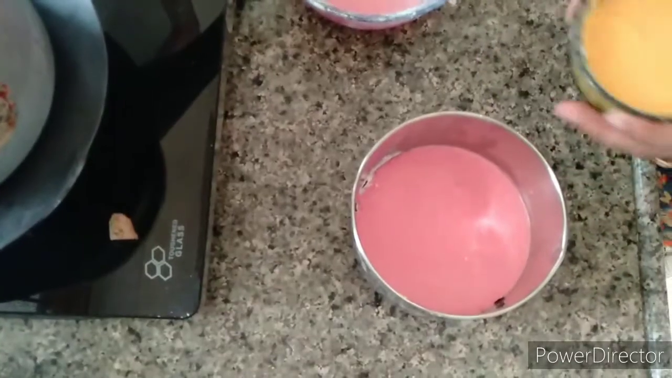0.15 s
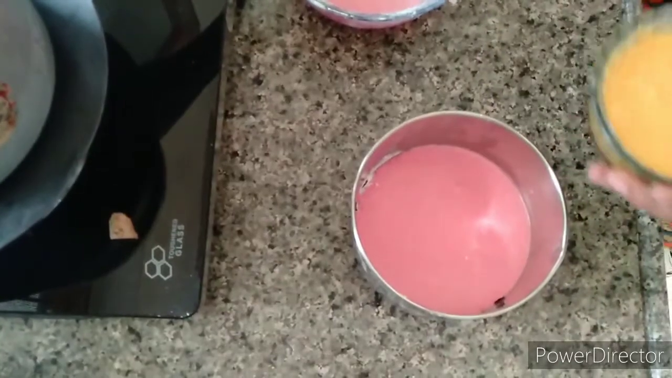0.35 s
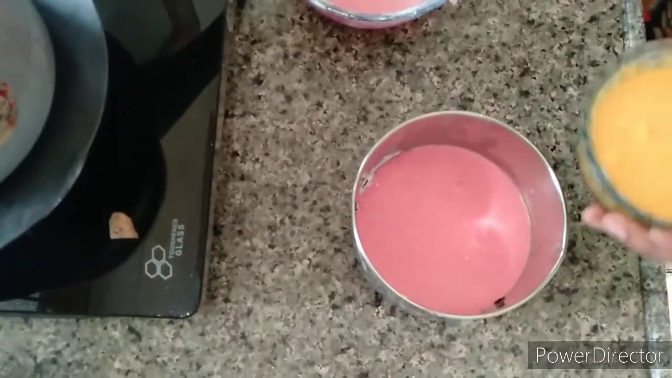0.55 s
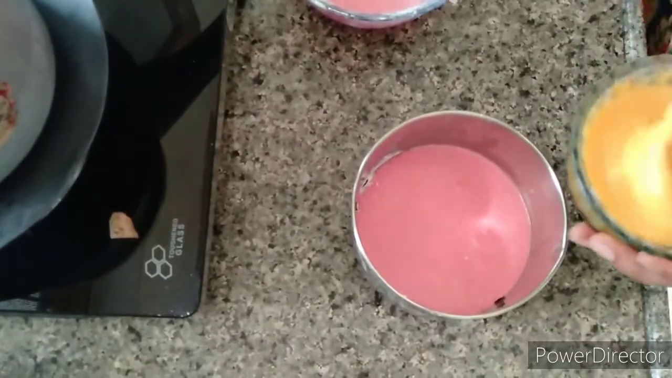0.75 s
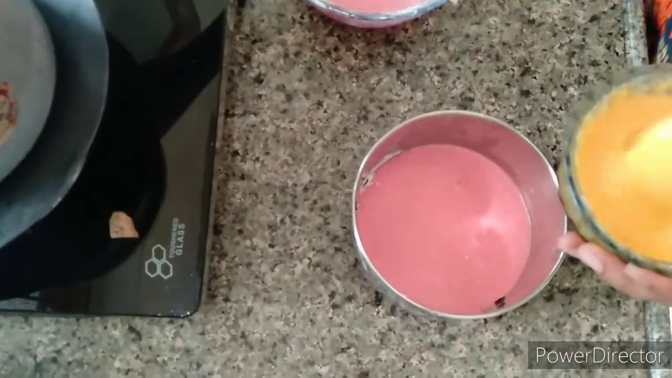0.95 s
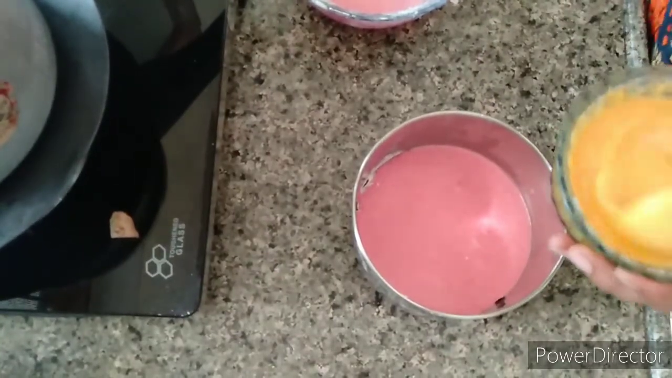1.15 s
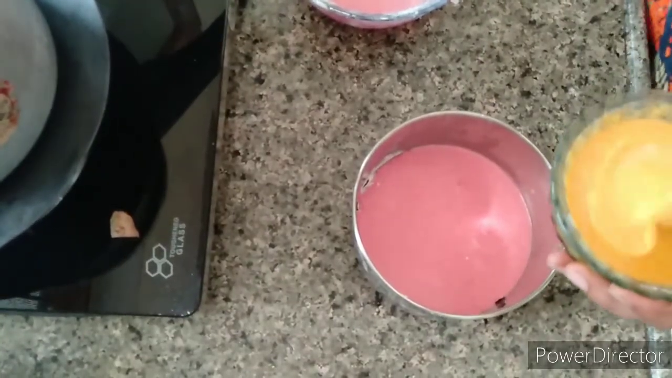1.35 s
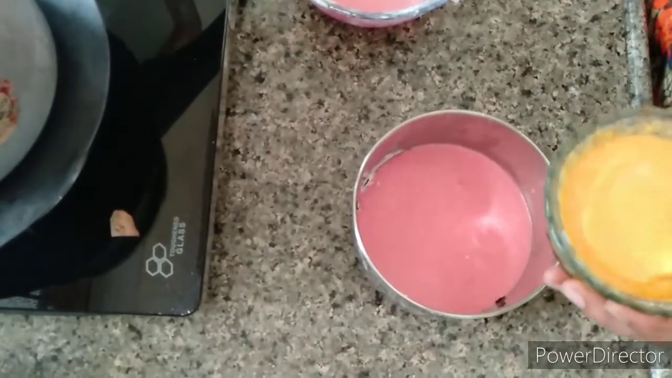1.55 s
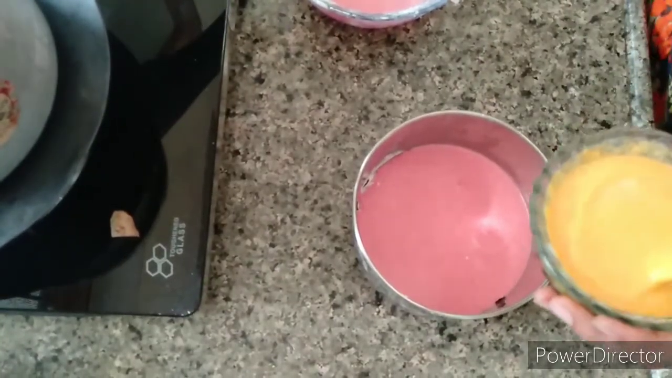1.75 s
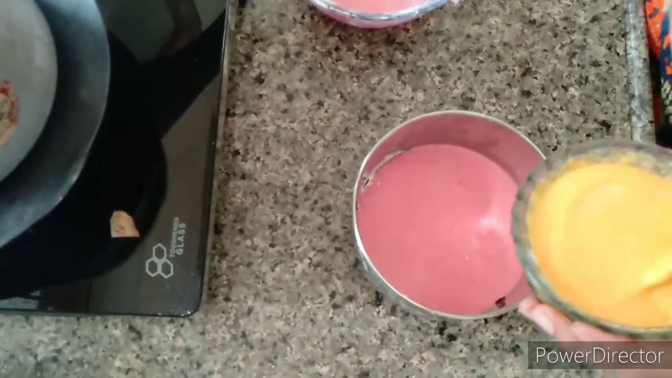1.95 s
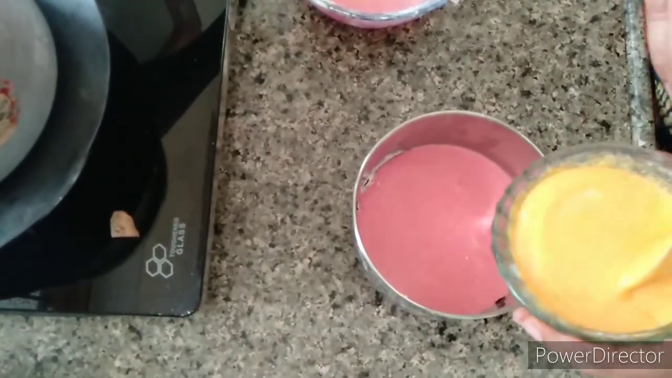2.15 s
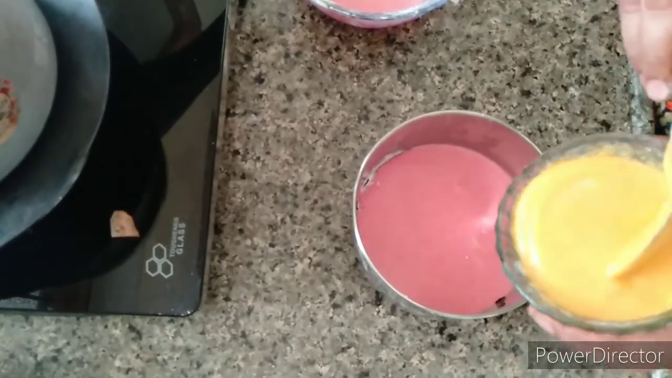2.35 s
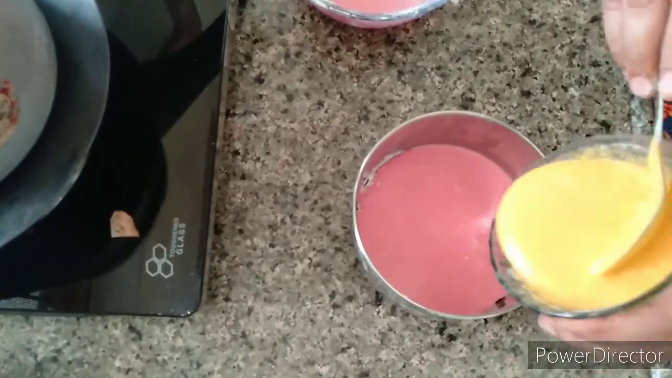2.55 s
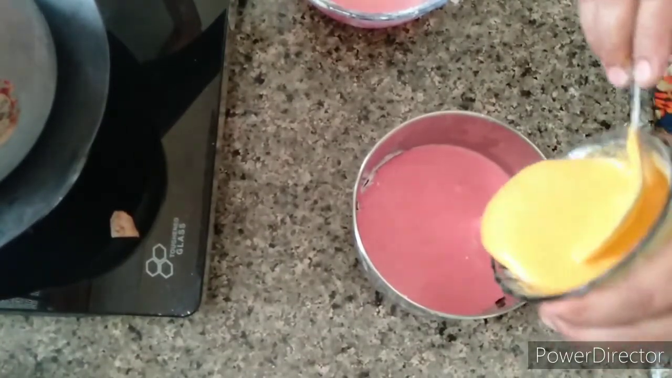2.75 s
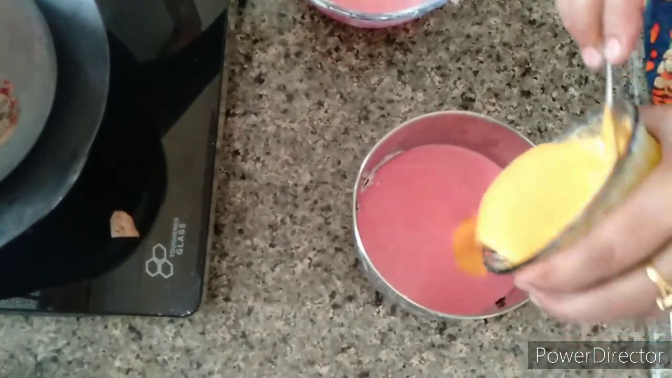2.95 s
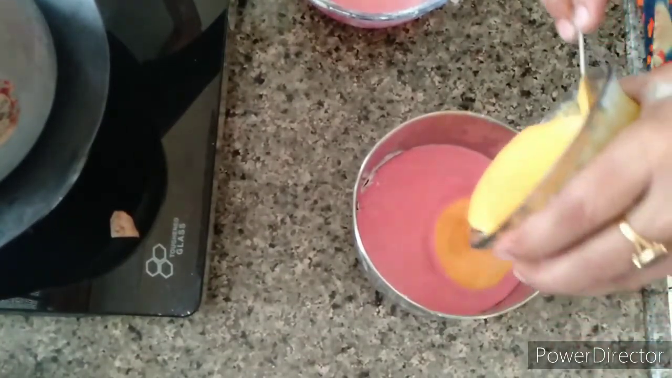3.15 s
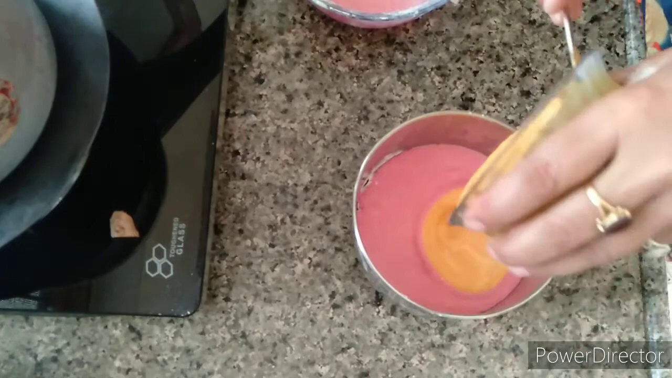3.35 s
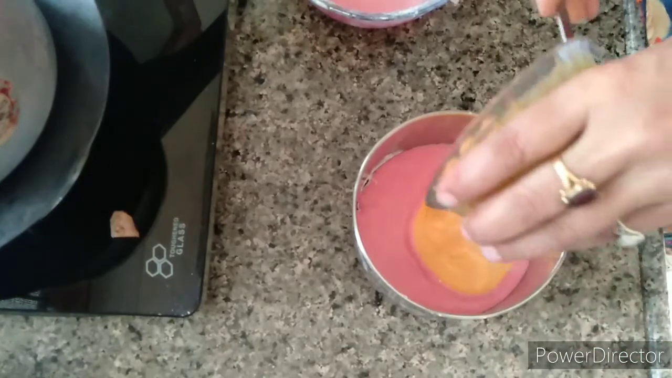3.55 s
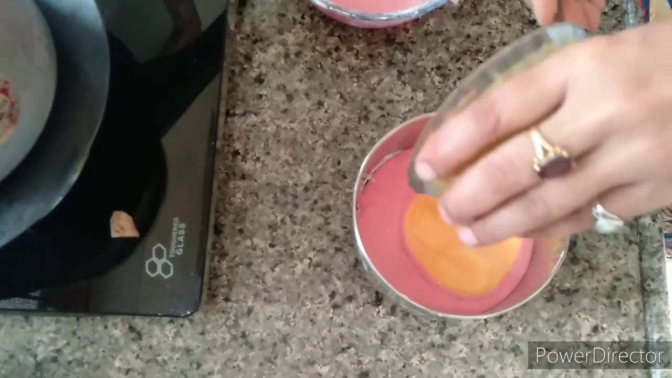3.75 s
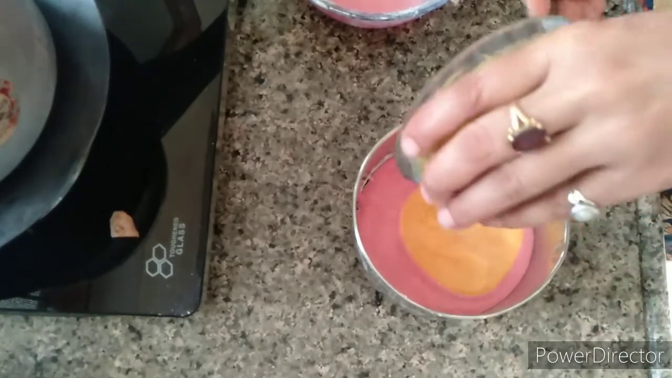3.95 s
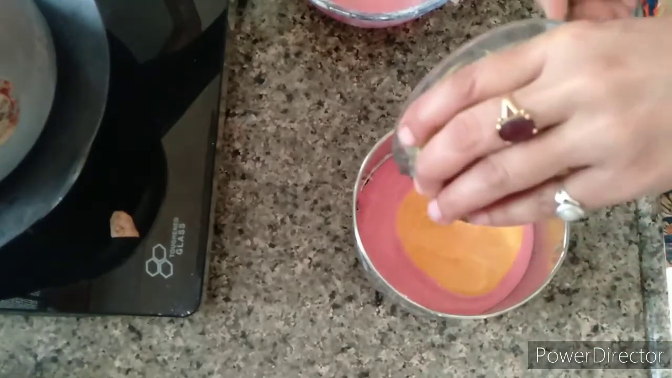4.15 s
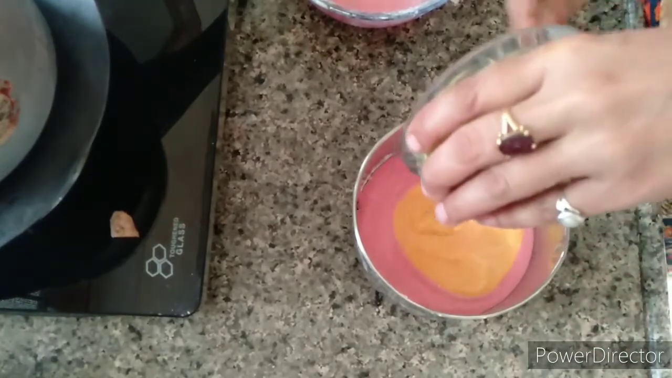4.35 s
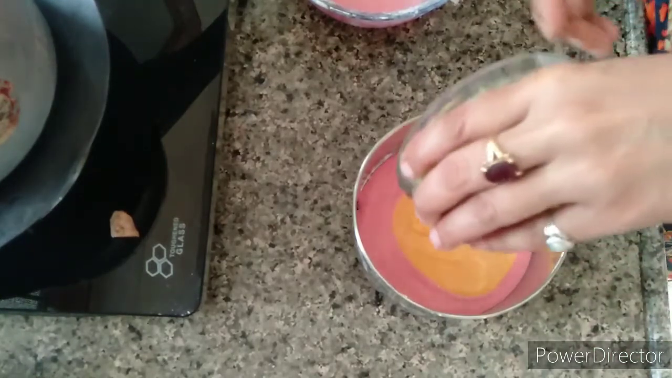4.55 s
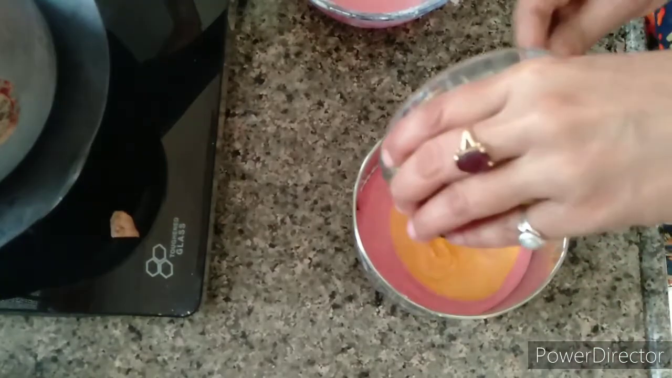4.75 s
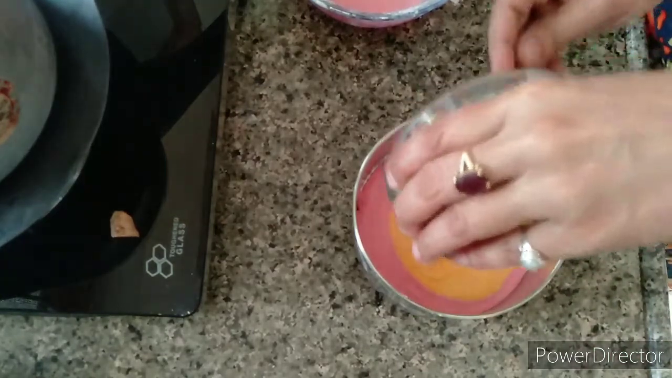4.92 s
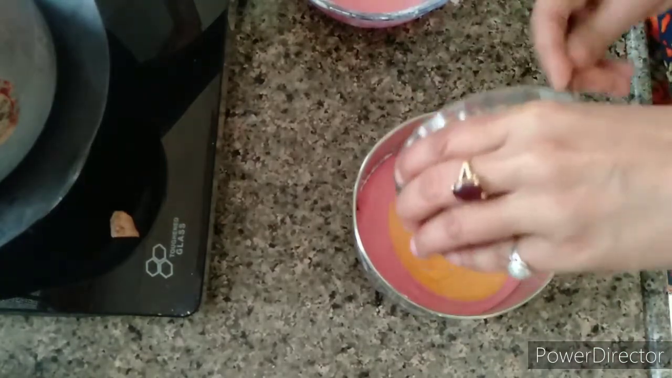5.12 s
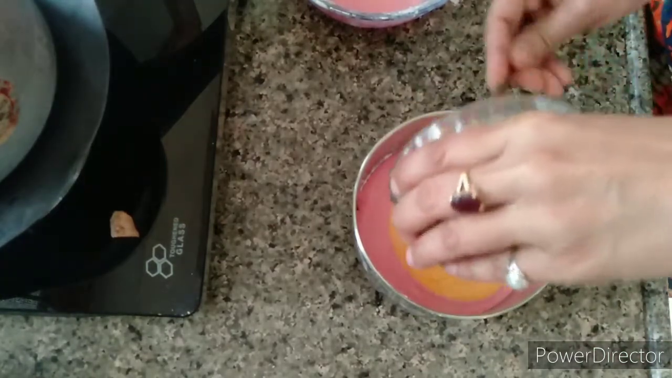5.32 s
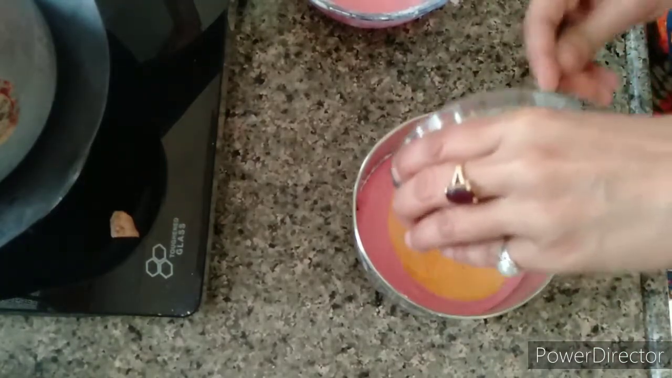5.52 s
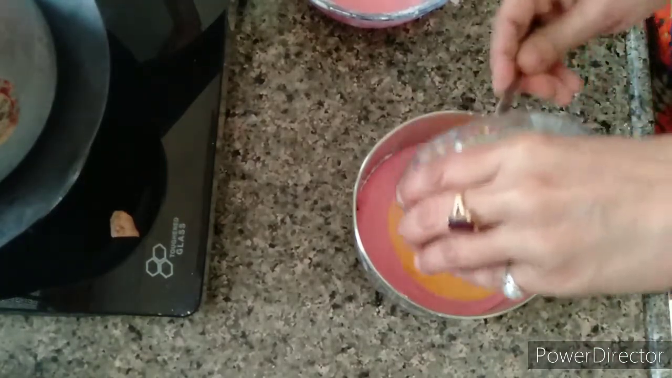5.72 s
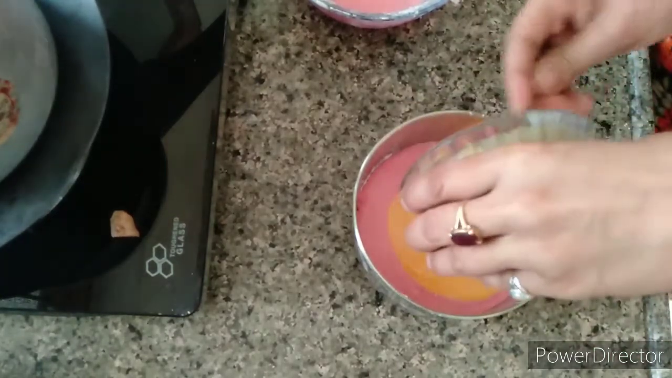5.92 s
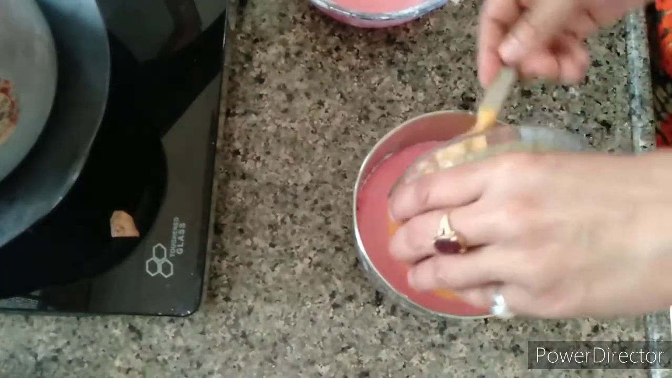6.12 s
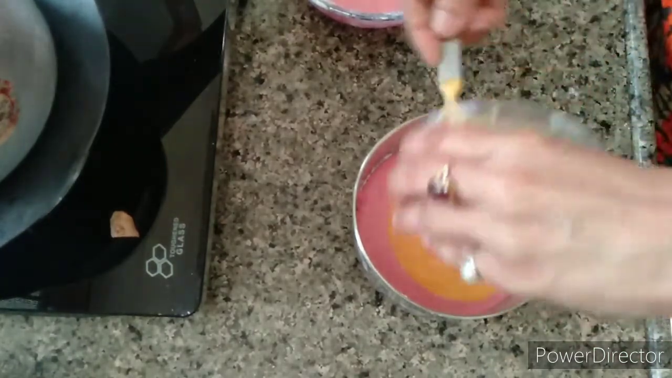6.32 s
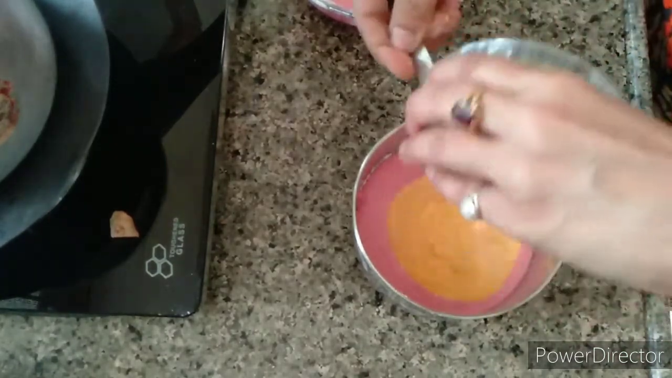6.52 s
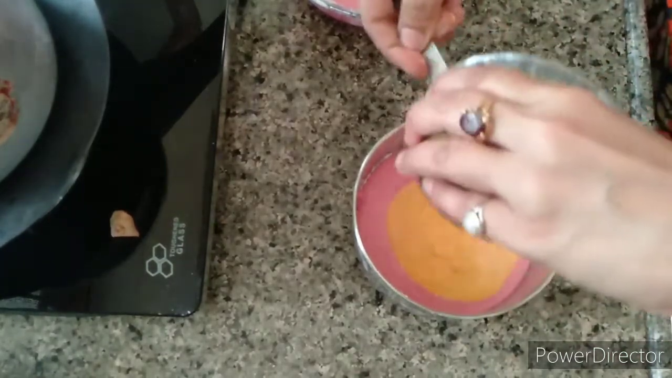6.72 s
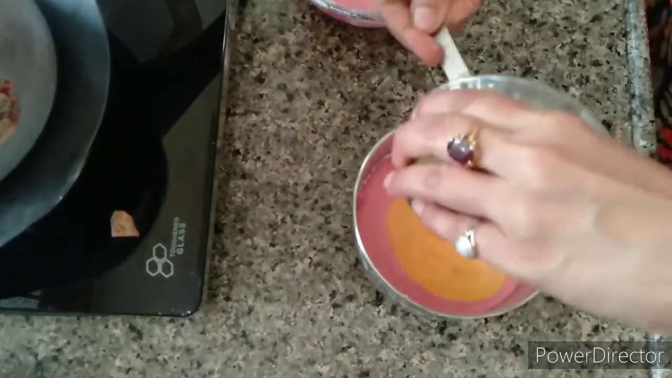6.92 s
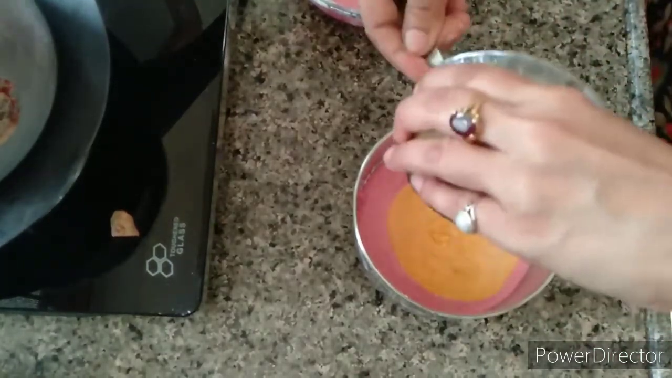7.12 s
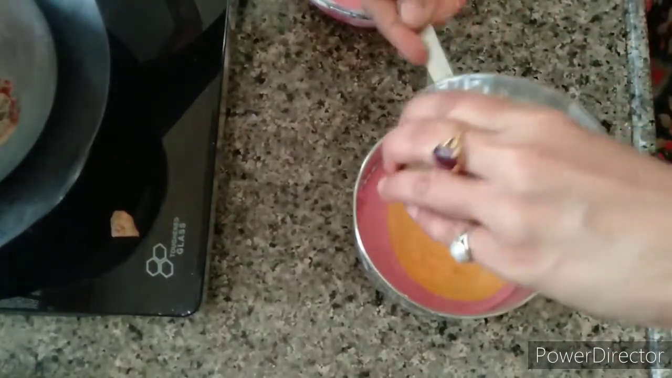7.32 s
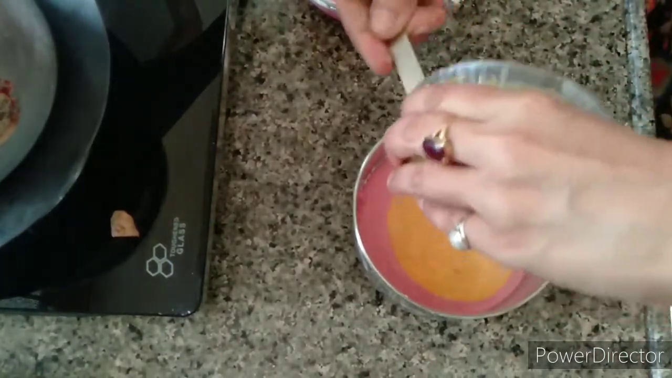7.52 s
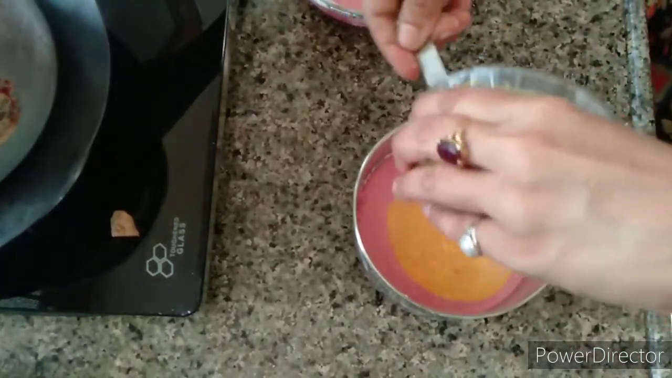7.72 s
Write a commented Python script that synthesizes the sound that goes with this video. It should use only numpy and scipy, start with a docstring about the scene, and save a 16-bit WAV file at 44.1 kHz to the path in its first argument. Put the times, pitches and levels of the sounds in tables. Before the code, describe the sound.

After soft rustling, a dull crockery knock and thin bird chirps, a metal spoon taps a glass bowl with increasingly loud, short, bright clinks.

```python
"""Spoon against a glass bowl

A steel spoon clinks on a hand-held glass bowl of batter in a small hard kitchen: each blow is a noisy clack,
a spoon ring, decaying paired bowl modes and a hollow pock. Grains of noise rub, short gliding tones squeak,
and banded noise drags, swishes and rustles. A crockery knock sounds early on; a bird calls in gliding tones,
a far motor drones in shaft harmonics, and hum, whines and hiss fill the room."""
import sys
import numpy as np
from scipy import signal
from scipy.fft import rfft, irfft
from scipy.io import wavfile
from scipy.ndimage import uniform_filter1d

SR = 44100
rng = np.random.default_rng(int(sys.argv[2]) if len(sys.argv) > 2 else 0)


def inscribe(sig):
    """Save sig as 16-bit PCM at rate SR to the path in sys.argv[1].

    A 1-D sig is mono; a 2-D sig holds one channel per row.
    Samples are clipped to [-1, 1] before scaling.
    """
    pcm = np.round(np.clip(np.atleast_2d(sig).T, -1, 1) * 32767)
    wavfile.write(sys.argv[1], SR, pcm.astype(np.int16))


N = 343098
T = np.arange(N) / SR


def undb(db):
    """Decibels to gain."""
    return 10 ** (np.asarray(db) / 20)


def unit(x):
    """Scale to rms 1."""
    return x / np.sqrt(np.mean(x ** 2) + 1e-20)


def curve(rows):
    """Interpolate each column of a (t/s, ..) table at every sample."""
    s, *columns = np.transpose(rows)
    return [np.interp(T, s, c) for c in columns]


def on_log(hz, points):
    """Read (f/Hz, value) points on a log-frequency axis."""
    f, value = np.transpose(points)
    return np.interp(np.log(hz + 1), np.log(f), value)


def colour(x, points):
    """Minimum-phase filter with a (f/Hz, level/dB) response: causal, like a struck body."""
    size = 8192
    gain = undb(on_log(np.fft.rfftfreq(size, 1 / SR), points))
    cepstrum = irfft(np.log(gain))
    # fold the cepstrum to its causal half
    cepstrum[1:size // 2] *= 2
    cepstrum[size // 2 + 1:] = 0
    impulse = irfft(np.exp(rfft(cepstrum)))
    return signal.fftconvolve(x, impulse)[:len(x)]


def band(x, lo_hz, hi_hz, order=2):
    """Butterworth band-pass between two edges."""
    edges_hz = [lo_hz, min(hi_hz, SR / 2 - 1)]
    return signal.sosfilt(signal.butter(order, edges_hz, "band", fs=SR, output="sos"), x)


def narrow_noise(peaks):
    """Noise held in narrow (f/Hz, width/Hz, level/dB) resonances."""
    return sum(undb(db) * unit(band(rng.standard_normal(N), hz - width / 2, hz + width / 2))
               for hz, width, db in peaks)


def walk(rate_hz):
    """Smoothed random walk-like drift, rms 1, with rate_hz new values per second."""
    k = max(int(SR / rate_hz), 1)
    steps = np.repeat(rng.standard_normal(N // k + 1), k)
    return unit(uniform_filter1d(steps, k)[:N])


def add(track, s, x):
    """Mix x into the track at time s."""
    i = int(s * SR)
    track[..., i:i + x.shape[-1]] += x[..., :N - i]


def fade(t, t60):
    """Free decay by 60 dB in t60."""
    return np.exp(-np.log(1000) * t / t60)


def contact(points, t60, snap):
    """Hard tick and dense short ringing; rows: direct path (rms 1 over 4 ms), room feed of equal energy."""
    t = T[:SR // 8]
    tick = (t == 0) * 1.
    ringing = rng.standard_normal(len(t)) * fade(t, t60)
    direct = colour(ringing + snap * tick, points)
    direct /= np.sqrt(np.mean(direct[:SR // 250] ** 2))
    # the room gathers all directions, so the notches of any one path average out
    spread = colour(tick, points)
    return np.array([direct, spread * np.linalg.norm(direct) / np.linalg.norm(spread)])


def whistle(rows, waver, edge_s):
    """One unsteady, flickering tone gliding along (t/s, f/Hz, level/dB) rows."""
    s, hz, db = np.transpose(rows)
    t = np.arange(s[0], max(s[-1], s[0] + .01), 1 / SR)
    wobble, flicker = (unit(uniform_filter1d(rng.standard_normal(len(t)), size=k)) for k in (60, 250))
    pitch = np.interp(t, s, hz)
    phase = 2 * np.pi * np.cumsum(pitch * (1 + waver * wobble)) / SR
    octave = undb(-19.5) * np.sin(2 * phase) * (pitch < SR / 6)
    gate = np.clip(np.minimum(t - t[0], t[-1] - t) / edge_s, 0, 1)
    level = undb(np.interp(t, s, db) + 2 * flicker)
    return gate * level * (np.sin(phase) + octave)


def strokes(rows, rise_share):
    """Gain of sliding movements (t/s, length/s, level/dB): each swells, then falls to nothing."""
    gain = 0
    for s, length, db in rows:
        peak_s = s + np.clip(rise_share, .01, .99) * length
        ramp = np.interp(T, [s, peak_s, s + length], [0, 1, 0])
        gain = gain + undb(db) * np.sin(np.pi / 2 * ramp)
    return gain


def clinks(clack_db, spoon_db, bowl_db, pock_db, pock_t60):
    """Landing point sets which bowl modes ring; pressure raises the low modes, damps all, lowers clack and pock."""
    # blows: t/s, force/dB; re force: brightness/dB, low modes/dB, middle modes/dB, pock/dB; pressure (0-1)
    blows = [(2.9435, -44, -12, -5, -12, -10, .3), (3.5575, -31.5, -6.5, 1, -22, -12, 0),
             (3.594, -41.5, -4, -8, -13, -5, 0.71), (4.0447, -36.5, -14, 4, -20, -24, 0.98),
             (4.623, -44, -9, -16, -12, 12.5, .9), (4.7052, -23, -7.5, -14, -22, -7, .85),
             (5.1029, -28, -9.5, -8.5, -10, 0, 0.92), (5.2982, -14.5, -3.5, -6, 8.5, -19, 0),
             (5.5347, -22.5, -5, -6, 0, -13, 0.5), (5.5496, -25, -6, -12, -19, -.5, 0.1),
             (5.576, -25, -19, -9.5, -11, -5.5, .1), (5.8562, -33, 3, -32, -28, 11, 0.43),
             (6.102, -10.5, -1, -6, 2, -33, 0.069), (6.3136, -20.5, -1.5, -4, -28, -5, 0.42),
             (6.384, -30.5, -6, -7, -24, 6, 0.127), (6.4936, -32, 1, -6, 9, -16, .5),
             (6.7368, -23.5, -4, 3.5, 4.5, -11, 0.33), (7.065, -12.5, -2, -43, 9.5, -42, .2),
             (7.197, -31, -14, -1.5, -9, -8, 0.47), (7.412, -13, -1.5, -6, 0.5, -11, 0.38),
             (7.474, -24.5, -6, -6, -7.5, 0.5, 0.06)]
    # bowl modes: f/Hz unpressed, t60/s unpressed, relative level/dB, group (0 low, 1 middle, 2 high)
    bowl_modes = [(1818, 0.089, -4.5, 0), (1859, 0.081, -4.5, 0), (2796, 0.047, -11.5, 0),
                  (4815, 0.048, -9, 1), (4830, 0.034, -28.5, 1), (5050, 0.041, -44, 1),
                  (8300, 0.033, -7, 2), (8356, 0.031, -1.5, 2)]
    # clack spectrum: multiple of clack frequency, relative level/dB
    clack_spectrum = [(0.044, -48.5), (.14, -19.5), (.23, -8.5), (.37, 6.5), (.52, 4.5), (.67, 6), (.79, 1),
                      (1, 9.5), (1.2, 3.5), (1.6, -15)]
    # spoon ring spectrum: f/Hz, relative level/dB
    spoon_spectrum = [(3500, -17), (5100, 0), (6000, 12.5), (7200, 8), (8700, 0), (9400, -15), (10800, -57),
                      (12200, -0.5), (13600, -20), (15300, 1)]
    free_clack_hz, free_pock_hz = 4745, 1434
    # shares at full pressure
    low_mode_rise, ring_time_loss = 0.061, 0.37
    clack_drop, pock_drop = 0.16, 0.22  # grow with pressure squared
    high_modes_db = -7.5  # re brightness
    out, t = np.zeros((2, N)), T[:SR // 2]
    for s, force, bright, low, mid, pock, press in blows:
        press = np.clip(press, 0, 1)

        clack_hz = free_clack_hz * (1 - clack_drop * press ** 2)
        clack_points = [(k * clack_hz, db) for k, db in clack_spectrum]
        add(out, s, undb(force + clack_db) * contact(clack_points, t60=0.032, snap=7.2))

        add(out, s, undb(force + bright + spoon_db) * contact(spoon_spectrum, t60=0.023, snap=2.1))

        ring = max(1 - ring_time_loss * press, .1)
        levels_db = (low, mid, bright + high_modes_db)
        shifts = (1 + low_mode_rise * press, 1, 1)
        for hz, t60, db, group in bowl_modes:
            k = round(group)
            mode = np.sin(2 * np.pi * hz * shifts[k] * t) * fade(t, t60 * ring)
            add(out, s, undb(force + levels_db[k] + db + bowl_db) * mode)

        # the air in the upturned bowl answers with a short, noisy hollow note
        pock_hz = free_pock_hz * (1 - pock_drop * press ** 2)
        hollow = [(pock_hz / 4, -42), (pock_hz * 0.47, -22), (pock_hz * 0.86, -11),
                  (pock_hz, 0), (pock_hz * 1.18, -9), (pock_hz * 2, -36)]
        add(out, s, undb(force + pock + pock_db) * contact(hollow, t60=pock_t60, snap=19.3))
    return out


def knocks(knock_db, room_db):
    """Dull knock of crockery: a damped blow with no clear note."""
    # blows: t/s, level/dB before knock_db
    knock_blows = [(1.138, -17.5)]
    # spectrum: f/Hz, relative level/dB
    knock_spectrum = [(150, -39), (230, -32), (315, 6.5), (410, -19), (800, -2.5), (1130, -11.5), (1480, 4),
                      (2050, -5), (3100, -2.5), (3600, -8), (4450, -7.5), (5200, -13.5), (7200, -16),
                      (9500, -28), (15000, -30)]
    out = np.zeros((2, N))
    row_gains = np.array([[1], [undb(room_db)]])
    for s, db in knock_blows:
        add(out, s, undb(db + knock_db) * contact(knock_spectrum, t60=0.023, snap=11) * row_gains)
    return out


def rubbing(grains_per_s, grain_db):
    """Tiny random slips on wet glass, the spoon's singing edge, and the slide of sleeve and hand."""
    # steady rub, before random drift: t/s, level/dB
    rub_level = [(3.4, -68.5), (5.0, -66), (5.5, -61.5), (6.6, -58.5), (7.78, -63)]
    # spectra: f/Hz, relative level/dB
    rub_spectrum = [(600, -4.5), (1200, -1), (2000, -1.5), (3000, 0), (4000, -6.5), (6800, -3.5),
                    (9000, -15.5), (15000, -16)]
    swish_spectrum = [(1000, -0.5), (3000, 1.5), (4500, -2), (6700, 6), (9000, -7.5), (11500, -13),
                      (15000, 2)]
    # quick rubs, edge drags, sleeve and hand slides: t/s, length/s, level/dB
    scuff_strokes = [(1.102, 0.042, -53), (3.155, 0.088, -61), (4.41, .04, -56.5), (4.871, .07, -63),
                     (5.262, 0.059, -51), (6.045, 0.06, -53), (7.603, 0.024, -51)]
    drag_strokes = [(5.58, .36, -57.5), (7.6, 0.043, -52.5)]
    swish_strokes = [(0, 0.22, -56.5), (.22, 0.23, -49), (.48, 0.65, -56), (1.1, 0.64, -61),
                     (2.1, .6, -60.5)]
    # edge resonances: f/Hz, width/Hz, relative level/dB
    edge_modes = [(2814, 130, 0.5), (2920, 91, 0), (3430, 180, -3)]
    hits = (rng.random(N) < grains_per_s / SR) * rng.standard_normal(N)
    slips = hits * undb(grain_db * np.minimum(rng.exponential(size=N), 4))
    pressure = undb(curve(rub_level)[0] + 4.1 * walk(11))
    for s, length, db in scuff_strokes:
        pressure = pressure + undb(db) * np.interp(
            T, [s, s + 0.0034, s + 0.0013 + length], [0, 1, .4], right=0)
    edge = unit(narrow_noise(edge_modes)) * strokes(drag_strokes, rise_share=0.21)
    sleeve = unit(colour(rng.standard_normal(N), swish_spectrum)) * strokes(swish_strokes, rise_share=0.64)
    return unit(colour(slips, rub_spectrum)) * pressure + edge + sleeve


def squeaks(squeak_db):
    """The wet spoon sticks and sings for a moment in a short gliding tone."""
    # t/s, start f/Hz, end f/Hz, level/dB before squeak_db
    squeak_tones = [(0.559, 1634, 1724, -46.5), (0.742, 1500, 1462, -50), (0.962, 2960, 2795, -50.5),
                    (1.786, 1854, 2040, -50.5), (3.992, 7000, 6700, -56.5), (5.266, 1580, 1750, -45),
                    (5.503, 1735, 1706, -43.5), (6.046, 4180, 4010, -52), (6.047, 7460, 6860, -50),
                    (7.285, 6620, 6860, -54)]
    squeak_s = 0.0315
    out = np.zeros(N)
    for s, start_hz, end_hz, db in squeak_tones:
        glide = [(s, start_hz, db + squeak_db), (s + squeak_s, end_hz, db + squeak_db)]
        add(out, s, whistle(glide, waver=0.045, edge_s=0.0024))
    return out


def handling():
    """The hand shifts its grip and turns the bowl: skin on glass, a soft low rustle."""
    # t/s, length/s, level/dB
    grip_strokes = [(4.1, 0.5, -62), (6.12, 0.51, -55)]
    rustle = unit(band(rng.standard_normal(N), 200, 617))
    return rustle * strokes(grip_strokes, rise_share=0.37)


def bird(bird_db):
    """Thin, slightly hoarse calls from outside: falling notes that then hold, and one louder call."""
    # notes: t/s, length/s, level/dB before bird_db
    chirp_notes = [(0.076, 0.17, -65), (2.26, 0.24, -62.5), (3.168, 0.18, -58.5), (4.011, 0.13, -64)]
    # louder call: t/s, f/Hz, level/dB before bird_db
    loud_call = [(2.47, 6630, -52), (2.51, 5545, -45.5), (2.55, 5370, -48), (2.595, 6320, -38),
                 (2.615, 8300, -50), (2.67, 10500, -47), (2.70, 9560, -37.5), (2.75, 9240, -56)]
    start_hz, end_hz, fall_share = 9300, 8450, .4
    out = np.zeros(N)
    calls = [[(s, start_hz, db), (s + fall_share * length, end_hz, db), (s + length, end_hz, db)]
             for s, length, db in chirp_notes]
    for call in calls + [loud_call]:
        add(out, call[0][0], whistle(call, waver=.024, edge_s=.01))
    return undb(bird_db) * out


def motor(sixth_db, fifth_db, seventh_db, rumble_db, fifth_waver_db):
    """Three wavering shaft harmonics of a far motor over an uneven rumble."""
    # shaft speed: t/s, f/Hz (turns per second)
    shaft_speed = [(0, 26.8), (1.3, 27.3), (2.2, 26.1), (3.0, 26.9), (3.4, 24.8), (5.6, 27.2), (7.78, 27.9)]
    # base level of harmonics 6 and 7, before their offsets and drift: t/s, level/dB
    line_level = [(0.25, -57.5), (0.76, -57.5), (1.31, -45), (1.82, -48), (1.96, -66), (2.02, -51),
                  (2.21, -41.5), (2.49, -50.5), (2.9, -49.5), (3.23, -59), (7.3, -57)]
    turn = 2 * np.pi * np.cumsum(curve(shaft_speed)[0]) / SR
    base_db, = curve(line_level)
    orders = (5, 6, 7)
    levels_db = fifth_db + fifth_waver_db * walk(4), base_db + sixth_db, base_db + seventh_db
    lines = sum(np.sqrt(2) * undb(db + walk(4.0)) * np.sin(k * turn + 0.36 * walk(5))
                for k, db in zip(orders, levels_db))
    rumble = unit(band(rng.standard_normal(N), 111.3, 160.4, order=3))
    return lines + rumble * undb(rumble_db + walk(3.4))


def room_air(air_db):
    """Wavering mains and appliance hum, thin whines of narrow noise, and a steady hiss."""
    # hiss spectrum: f/Hz, relative level/dB
    air_spectrum = [(20, -3.5), (45, -13.5), (90, -8.5), (200, -11), (300, -17.5), (500, -15.5),
                    (750, -19.5), (1400, -20.5), (2400, -29.5), (4500, -33.5), (7000, -32.5), (10000, -37),
                    (15300, -33)]
    # mains hum swell: t/s, level/dB re mains_db
    mains_swell = [(0, 1), (3.8, -2.5), (4.8, 3.5), (6.7, 8.5), (7.78, -5)]
    # appliance hum, rms before drift: f/Hz, level/dB
    hum_lines = [(116, -64), (386, -68.5), (540, -72), (1085, -73.5)]
    # whines: f/Hz, width/Hz, level/dB
    whine_peaks = [(3123, 59, -72.5), (4120, 180, -77.5), (5340, 59, -73), (6230, 55, -71.5),
                   (6690, 58, -75.5)]
    mains_hz, mains_db = 61, -65
    air = colour(rng.standard_normal(N), air_spectrum)
    air *= undb(-54 + air_db) / np.std(band(air, 223, 16800))
    mains_level = undb(mains_db + curve(mains_swell)[0] + 2 * walk(3.15))
    mains = mains_level * np.sin(2 * np.pi * mains_hz * T + .4 * walk(3.0))
    hum = sum(undb(db + 0.5 * walk(2.3)) * np.sin(2 * np.pi * hz * T + 0.63 * walk(5))
              for hz, db in hum_lines)
    return air + np.sqrt(2) * (mains + hum) + narrow_noise(whine_peaks)


def kitchen(x, wet_db, early_db, early_t60, gap_s):
    """Counter and tiles: sparse early reflections and a noise tail with its own decay time in each band."""
    # decay time: f/Hz, t60/s
    room_decay = [(200, 0.5), (1500, 0.39), (4500, 0.27), (8000, 0.45), (15000, 0.1)]
    t = T[:SR * 3 // 4]
    edges_hz = np.geomspace(80, 16000, 9)
    tail = 0
    for lo, hi in zip(edges_hz, edges_hz[1:]):
        noise = band(rng.standard_normal(len(t)), lo, hi, order=3)
        tail = tail + noise * fade(t, on_log(np.sqrt(lo * hi), room_decay))
    early = rng.standard_normal(len(t)) * (rng.random(len(t)) < .06) * fade(t, early_t60)
    onset = np.clip(t / gap_s - .5, 0, 1)  # silent for gap_s / 2, full at 1.5 gap_s
    response = sum(undb(db) * part * onset / np.linalg.norm(part * onset)
                   for db, part in ((wet_db, tail), (early_db, early)))
    return signal.fftconvolve(x, response)[:N]


def scene():
    """Sounds at the bowl are mostly direct; the bird arrives with more of the room."""
    blows = clinks(clack_db=-4.5, spoon_db=-4.0, bowl_db=0.5, pock_db=-7.5, pock_t60=0.088)
    direct, spread = blows + knocks(knock_db=-4.5, room_db=-4.0)
    friction = rubbing(grains_per_s=7000, grain_db=1.2) + squeaks(squeak_db=1.5)
    near_room = kitchen(spread + friction, wet_db=-8.5, early_db=-11.5, early_t60=0.11, gap_s=0.0083)
    near = direct + friction + near_room + handling()
    calls = bird(bird_db=-3.0)
    far = calls + kitchen(calls, wet_db=0.5, early_db=-11, early_t60=0.086, gap_s=0.0036)
    drone = motor(sixth_db=-0.5, fifth_db=-56.5, seventh_db=-16, rumble_db=-56.5, fifth_waver_db=3.5)
    return (near + far + drone + room_air(air_db=-2.0))[None]


def record(dry):
    """Soft saturation rounds the sharpest peaks; a steep elliptic low-pass cuts the top."""
    rounded = 1.6 * np.tanh(dry / 1.6)
    return signal.sosfilt(signal.ellip(12, .2, 70, 15500, fs=SR, output="sos"), rounded)


dry = scene()
out = record(dry)
inscribe(out)
```